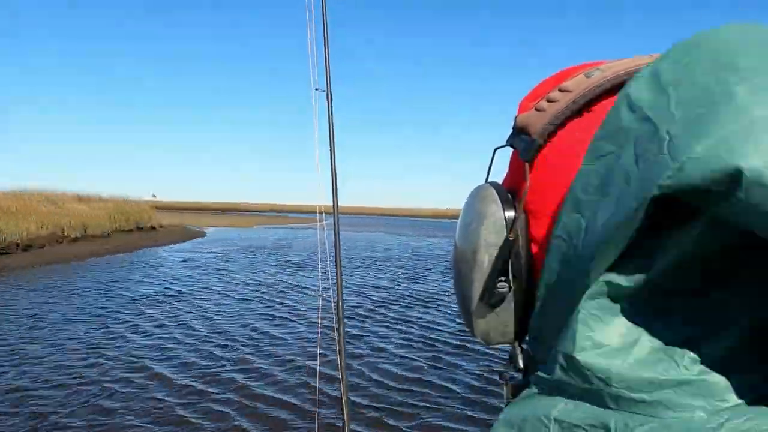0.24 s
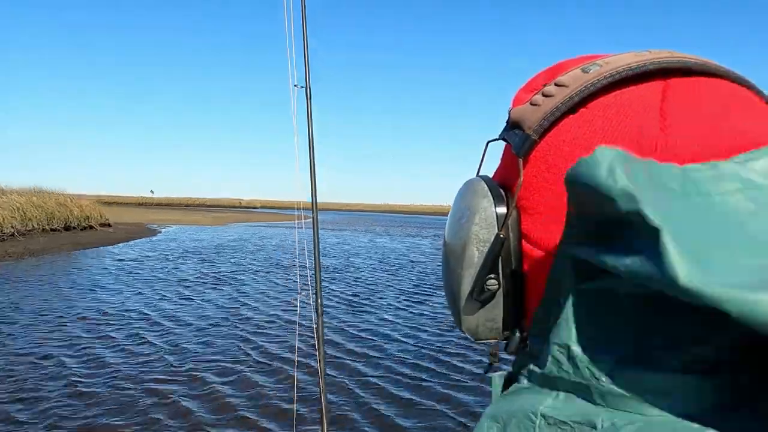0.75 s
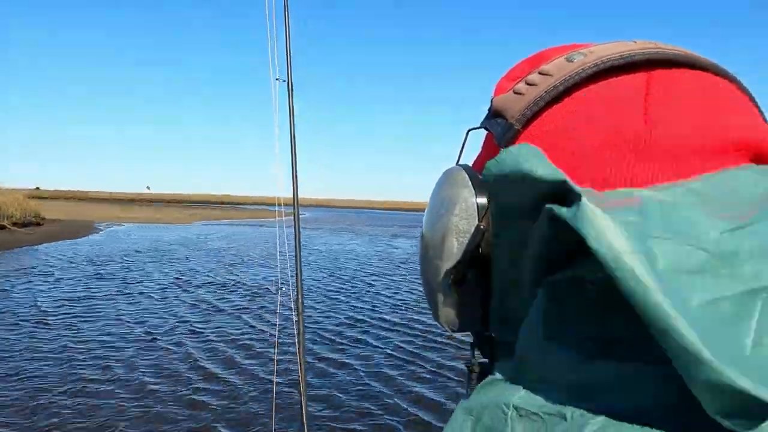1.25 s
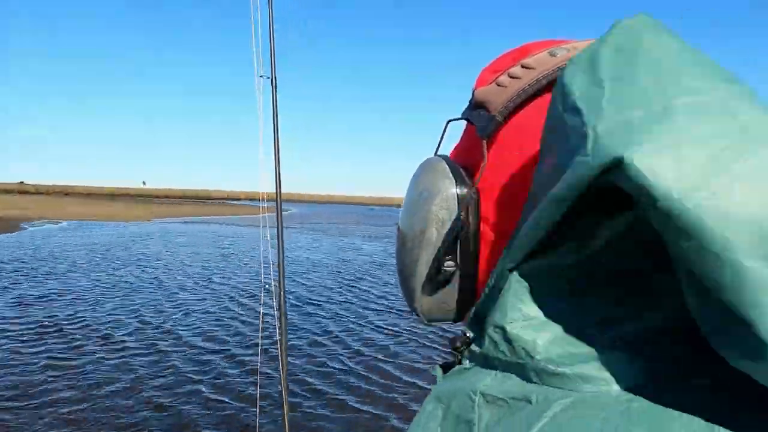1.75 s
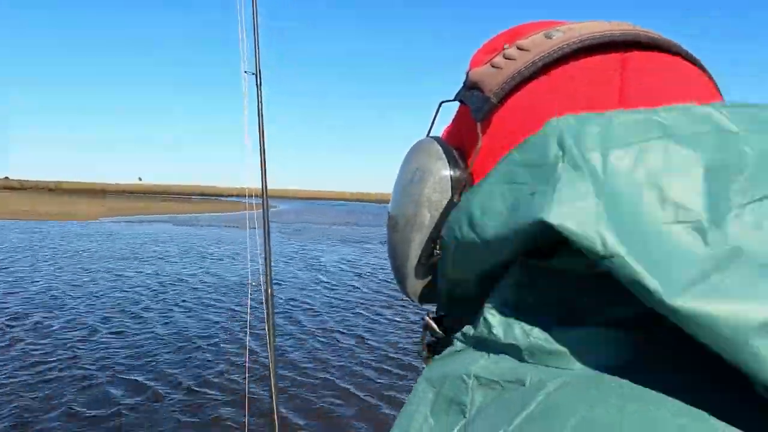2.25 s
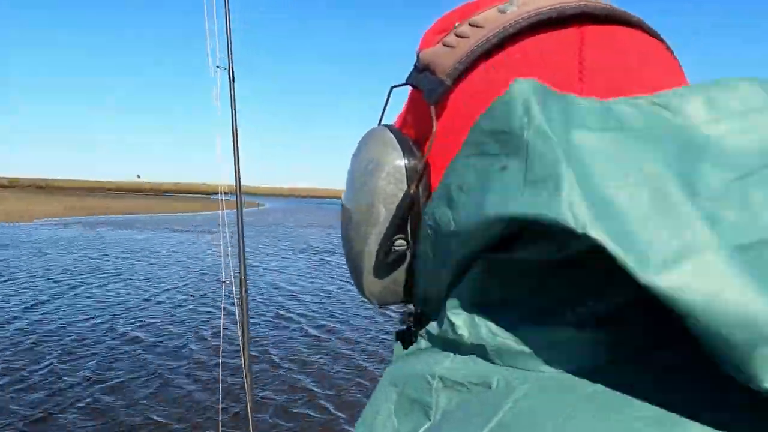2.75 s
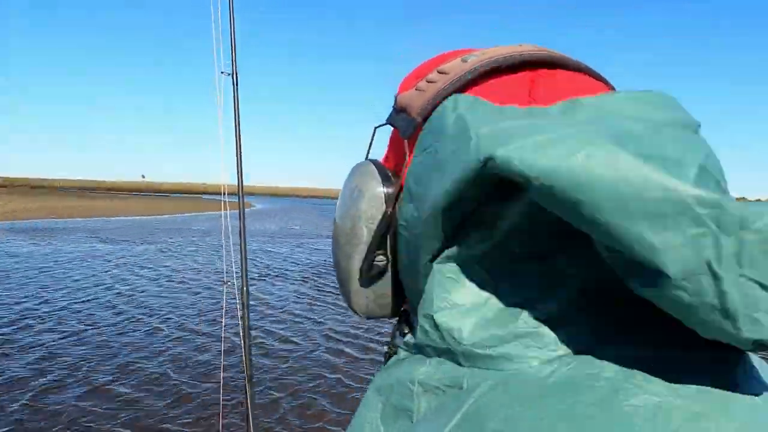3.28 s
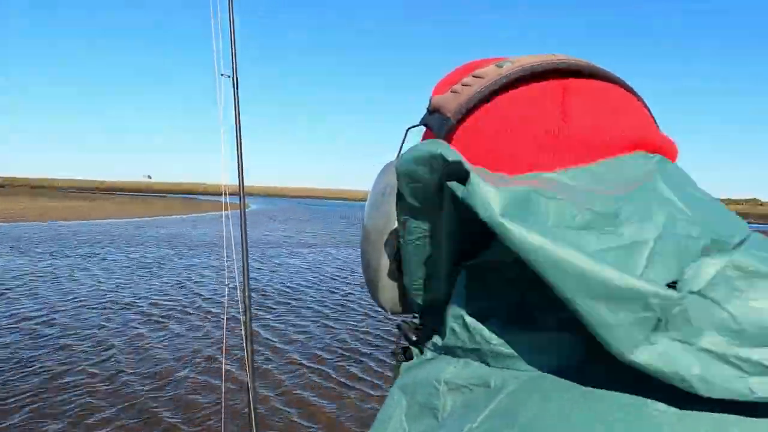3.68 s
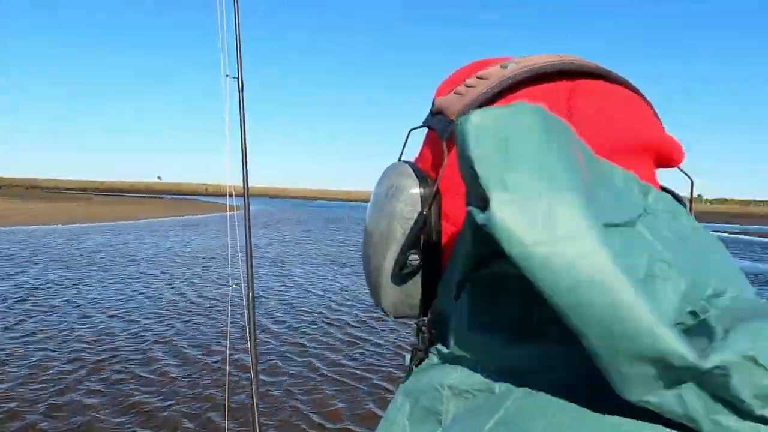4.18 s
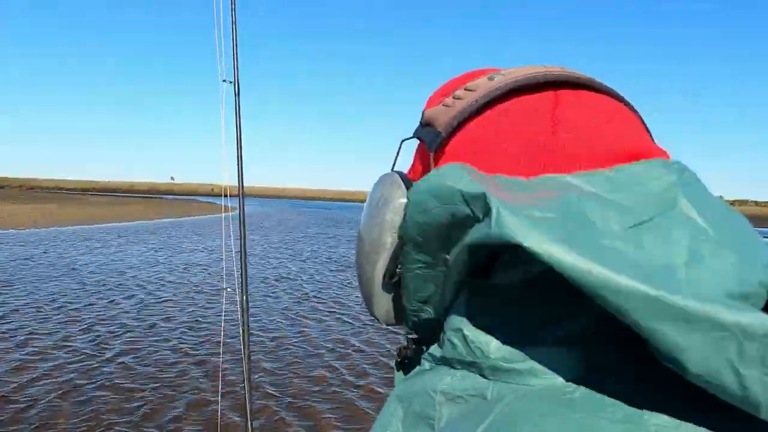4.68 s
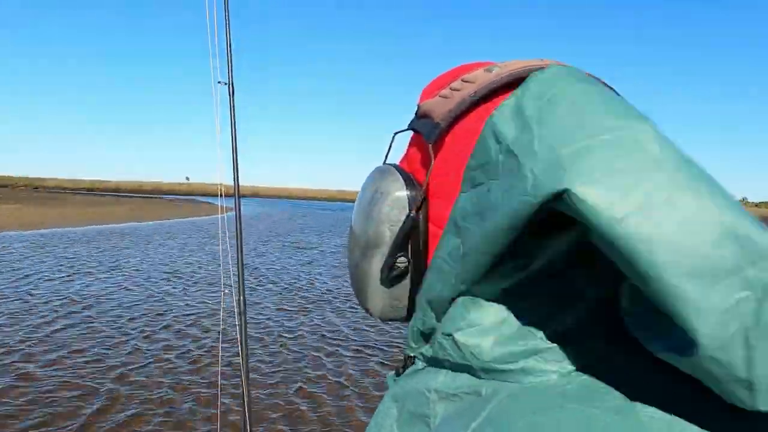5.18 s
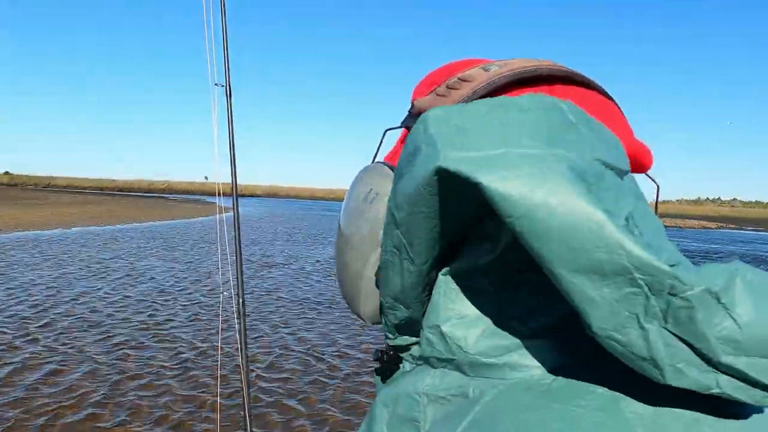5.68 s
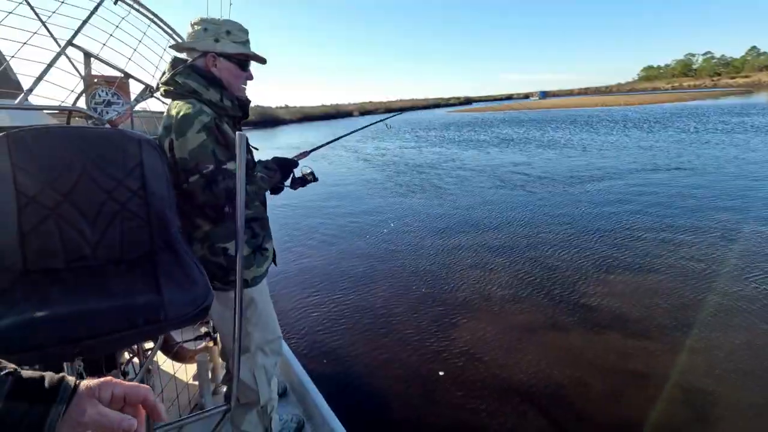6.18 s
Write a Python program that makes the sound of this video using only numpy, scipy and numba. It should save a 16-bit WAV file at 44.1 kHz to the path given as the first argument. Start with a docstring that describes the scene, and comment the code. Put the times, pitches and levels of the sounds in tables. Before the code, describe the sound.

From the start, an airboat's engine and propeller make a loud, buzzing drone, heard from on board. The pitch sinks slightly over the first two seconds, then holds steady. Churned air roars beneath it, with a lighter hiss of spray. Wind rumbles on the microphone throughout, with harder thumps around 1, 2.2 and 4.2 seconds and a swell near 2.5 seconds. A nylon hood flaps close by in short, soft, irregular bursts, clustered around 0.5 to 1.2 and 2 to 3 seconds, then sparser from 4.2 to 5.5. At about 5.9 seconds the drone cuts off with a click, and it is suddenly much quieter. Low puffs of wind bump the microphone over faint cloth rustle and a thin, quickly fading whine. Three tiny ticks come near 6.2 seconds, and the wind eases before the sound ends at about 6.4 seconds.

```python
"""An airboat's V8 engine and three-blade propeller drone at speed.
The propeller turns at half the engine's speed, so blade and exhaust tones blend into one buzz.
Air roars behind the blades, spray hisses, a nylon hood flaps and wind buffets the microphone.
Then the scene jumps to the boat at rest: gusts thump the microphone over a faint rustle,
a thin whine and a few ticks."""
import sys
import numpy as np
from scipy import signal
from scipy.fft import rfft, irfft, next_fast_len
from scipy.io import wavfile
from scipy.ndimage import uniform_filter1d
from numba import njit

SR = 44100
rng = np.random.default_rng(int(sys.argv[2]) if len(sys.argv) > 2 else 0)


def int16_out(signal):
    """Quantize to a 16-bit WAV file."""
    q = np.round(np.clip(np.atleast_2d(signal).T, -1, 1) * 32767)
    wavfile.write(sys.argv[1], SR, q.astype(np.int16))


N = 283563
T = np.arange(N) / SR

# How often the cylinders fire: time_s, firing_hz
ENGINE_SPEED = [(0, 232), (.13, 230.8), (.56, 229.3), (.75, 227.8), (1.44, 225.8), (1.9, 225), (2.2, 223.1),
                (5.89, 222.8)]
# Tones of the uneven cylinder banks: multiple_of_cycle_rate, level_db
EXHAUST_TONES = [(2, -6), (5, -8), (7, -5.5), (8, 5.5), (10, -9.5), (11, -16), (14, -35), (16, -21),
                 (17, -18.5), (19, -24), (29, -19.5), (35, -25.5)]
# Tones of the passing blades: multiple_of_blade_rate, level_db
BLADE_TONES = [(1, -1.5), (2, -3), (3, 1.5), (4, -6.5), (5, -7.2), (6, -11.3), (7, -15.5), (8, -18.5),
               (9, -19.5), (10, -18), (11, -18.5), (12, -26), (13, -25), (14, -27), (15, -31), (16, -33)]
# Air and spray behind the propeller: time_s, roar_db, hiss_db
SLIPSTREAM_LEVELS = [(0, -23, -42), (.75, -20, -42), (1.055, -22, -43), (1.075, -22.5, -46.5),
                     (1.15, -20.5, -42.5), (1.3, -22, -43.5), (1.9, -25, -46), (2.15, -21, -43),
                     (2.8, -21.5, -46), (3.2, -22.5, -44.5), (4, -22, -44), (4.8, -20, -42.5),
                     (5.89, -19, -40)]
# Wind on the microphone at speed: time_s, level_db
WIND_LEVELS = [(0, -18.5), (.4, -24.5), (.7, -17.5), (1.1, -17), (1.4, -17.5), (1.9, -18.5), (2.15, -20.5),
               (2.5, -14), (2.85, -15), (3.2, -15.5), (3.8, -21.5), (4.1, -17.5), (4.4, -18.5), (4.85, -16),
               (5.2, -19), (5.89, -23.5)]
# Its hardest blows: middle_s, strength_db
BUFFETS = [(.97, 1), (1.064, 6), (1.18, 3), (2.15, 2.5), (4.231, 6)]
# Flaps of the hood: start_s, level_db
HOOD_FLAPS = [(.53, -42), (.715, -42), (.735, -41), (.755, -45), (.835, -42), (.95, -43), (1.0, -45),
              (1.043, -42), (1.152, -44), (2.15, -44), (2.205, -43), (2.434, -37), (2.52, -40.5),
              (2.735, -41), (2.755, -45), (2.84, -40.5), (2.86, -43), (2.95, -41.5), (3.052, -42),
              (4.219, -40), (4.329, -45), (4.451, -44), (5.079, -47), (5.458, -45)]
# Pitch range of the hood: low_hz, high_hz
HOOD_BAND = [1560, 4280]
# Puffs of wind at rest: middle_s, level_db, pitch_hz, half_length_s, noise_vs_tone_db
PUFFS = [(5.92, -23, 45, .015, -30), (5.943, -23, 60, .008, -26), (5.966, -18.5, 70, .012, -22),
         (5.992, -21, 120, .007, -14), (6.008, -19, 55, .012, -22), (6.029, -15.5, 160, .005, -17),
         (6.043, -12.5, 100, .008, -21), (6.065, -16.5, 120, .008, -19), (6.095, -23, 50, .012, -22),
         (6.12, -22.5, 200, .015, -11), (6.147, -28, 190, .01, -14), (6.19, -26, 100, .01, -19),
         (6.222, -27, 150, .012, -17), (6.28, -29, 50, .015, -24)]
# Rustling cloth at rest: time_s, level_db
RUSTLE_LEVELS = [(5.9, -56.5), (6.14, -55.5), (6.16, -58), (6.185, -51), (6.21, -57.5), (6.245, -61.5),
                 (6.3, -60.5), (6.35, -57.5), (6.43, -50)]
# Small ticks at rest: start_s, level_db, pitch_hz, crack_vs_ring_db
TICKS = [(6.162, -46, 1560, -14), (6.181, -46, 1600, 8), (6.1903, -50, 1700, 7)]
# The colour of each noise, from low to high: pitch_hz, relative_level_db
ROAR_COLOUR = [(150, -5.5), (300, -2), (500, -5), (900, -10.5), (1300, -15.5), (1800, -26), (2600, -40)]
SPRAY_COLOUR = [(1060, -11), (1800, -6.5), (2720, -7.5), (3180, -7), (6130, -18), (8250, -19), (11300, -32),
                (13500, -43.5), (15500, -55)]
WIND_COLOUR = [(8, -17.5), (15, -5.5), (30, -4), (60, -1.5), (90, -3), (130, -1.5), (200, -4), (300, -9.5),
               (450, -19.5), (800, -40)]
THUMP_COLOUR = [(12, -20), (22, -4), (45, 1), (100, -9), (160, -7.5), (250, -21)]
FLUTTER_COLOUR = [(100, -35), (180, -2), (300, -7), (600, -22), (1000, -51)]
RUSTLE_COLOUR = [(410, -12), (700, -5), (1000, -10.5), (1550, -10), (2200, -12.5), (2950, -13),
                 (4100, -20.5), (4600, -20), (5300, -26), (5900, -23), (6600, -27), (8200, -33),
                 (9000, -35), (14000, -48)]

REST_START_S = 5.8973
REST_TIME_S = np.maximum(T - REST_START_S, 0)


def exhaust(cycle_angle):
    """Eight cylinders fire in each engine cycle; their uneven pulses make a stack of tones."""
    return tone_stack(cycle_angle, EXHAUST_TONES, waver_db=1.2, waver_rad=.2, rate_hz=36, sway_db=.7)


def propeller(blade_angle, firing_hz):
    """Each passing blade pushes out a pulse; faster tips crack harder and sound brighter."""
    above_cruise_hz = firing_hz - 223
    tones = [(k, db + .09 * (min(k, 9) - 4) * above_cruise_hz) for k, db in BLADE_TONES]
    return tone_stack(blade_angle, tones, waver_db=2.1, waver_rad=.38, rate_hz=28, sway_db=.6)


def wind(level_db, gust):
    """Wind rumbles on the microphone; each hard blow also swings its membrane once."""
    rumble = undb(level_db + 1.64 * gust) * noise(WIND_COLOUR, flicker_db=1.5, rate_hz=17)
    swings, swing_hz = 0, 45
    for middle_s, strength_db in BUFFETS:
        turns = (T - middle_s) * swing_hz
        swings += undb(strength_db - 13) * np.sin(2 * np.pi * turns) * np.exp(-(2 * turns) ** 2)
    return rumble + swings


def slipstream(cycle_angle, blade_angle, gust):
    """Churned air roars and spray hisses, both pulsing with the blades and the engine."""
    roar_db, hiss_db = curves(SLIPSTREAM_LEVELS)
    pulse = 1 + .086 * np.cos(blade_angle) + .12 * np.cos(2 * blade_angle) + .027 * np.cos(cycle_angle)
    roar = undb(roar_db + .69 * gust) * noise(ROAR_COLOUR, flicker_db=.4, rate_hz=40)
    spray = undb(hiss_db + .26 * wander(30)) * noise(SPRAY_COLOUR, flicker_db=.2, rate_hz=24)
    return pulse * roar + pulse ** .42 * spray


def hood():
    """A nylon hood flaps in the wind, making short, soft bursts of noise."""
    out, t = np.zeros(N), np.arange(2600) / SR
    band = signal.butter(3, HOOD_BAND, "bandpass", fs=SR, output="sos")
    rise_s = .008
    shape = t / rise_s * np.exp(1 - t / rise_s)
    for start_s, level_db in HOOD_FLAPS:
        cloth = unit(signal.sosfilt(band, rng.standard_normal(len(t))))
        add(out, start_s, undb(level_db) * cloth * shape)
    return out


def puffs():
    """Each puff of wind rocks the microphone's membrane, with some noise from swirling air."""
    out, t = np.zeros(N), np.arange(-2000, 2000) / SR
    band = signal.butter(4, [180, 480], "bandpass", fs=SR, output="sos")
    for middle_s, level_db, pitch_hz, half_length_s, noise_db in PUFFS:
        swing = np.sin(2 * np.pi * (pitch_hz * t + rng.random()))
        swirl = undb(noise_db) * unit(signal.sosfilt(band, rng.standard_normal(len(t))))
        shape = np.exp(-(t / half_length_s) ** 2)
        add(out, middle_s + t[0], undb(level_db) * (swing + swirl) * shape)
    return out


def gusts():
    """At rest, wind thumps and flutters on the microphone, then drops to a lower level."""
    drop_start_s, drop_db_per_s = 6.24, 150
    level_db = np.maximum(-31.5 - drop_db_per_s * np.maximum(T - drop_start_s, 0), -38.5)
    thump = noise(THUMP_COLOUR, flicker_db=3, rate_hz=35)
    flutter = undb(-14.5) * noise(FLUTTER_COLOUR, flicker_db=1.5, rate_hz=44)
    return undb(level_db) * (thump + flutter)


def rustle():
    """Cloth rustles faintly."""
    return undb(curves(RUSTLE_LEVELS)[0]) * noise(RUSTLE_COLOUR, flicker_db=1.3, rate_hz=53)


def whine():
    """A thin tone and its octave rise a little and quickly fade."""
    pitch_hz = np.minimum(735 + 480 * REST_TIME_S, 790)
    angle = 2 * np.pi * np.cumsum(pitch_hz) / SR
    tone = np.sin(angle) + undb(-5) * np.sin(2 * angle)
    fade = np.exp(-(REST_TIME_S / .1) ** 2)
    return undb(-57 + 2.2 * wander(60)) * fade * tone


def ticks():
    """Each tick is a tiny crack with a short ring."""
    out, t = np.zeros(N), np.arange(600) / SR
    dull = signal.butter(4, 5500, fs=SR, output="sos")
    for start_s, level_db, pitch_hz, crack_db in TICKS:
        crack = signal.sosfilt(dull, rng.standard_normal(len(t))) * np.exp(-t / .0013)
        ring = np.sin(2 * np.pi * pitch_hz * t) * np.exp(-t / .0036)
        add(out, start_s, undb(level_db) * (undb(crack_db) * crack + ring))
    return out


def tone_stack(angle, tones, waver_db, waver_rad, rate_hz, sway_db):
    """Tones at multiples of one rate; rough air sways them together and makes each one waver."""
    out = 0
    for k, db in tones:
        reach = min(k / 3, 1)  # low tones waver least
        level = undb(db + reach * waver_db * wander(rate_hz))
        lag = .3 * k * k  # echoes off hull and cage smear the pulse
        out += level * np.cos(k * angle - lag + reach * waver_rad * wander(rate_hz))
    return unit(undb(sway_db * wander(rate_hz / 2)) * out)


def noise(colour, flicker_db, rate_hz):
    """Noise of a given colour; each octave flickers in level on its own."""
    size = next_fast_len(N, real=True)
    hz = np.maximum(np.fft.rfftfreq(size, 1 / SR), 1)
    pitch_hz, level_db = np.transpose(colour)
    shape = undb(np.interp(np.log(hz), np.log(pitch_hz), level_db, -120, -120))
    spectrum = rfft(rng.standard_normal(size)) * shape
    out = 0
    for octave in np.arange(round(np.log2(pitch_hz[0])), round(np.log2(pitch_hz[-1])) + 1):
        share = np.cos(np.pi / 2 * np.clip(np.log2(hz) - octave, -1, 1)) ** 2
        out += undb(flicker_db * wander(rate_hz)) * irfft(spectrum * share, size)[:N]
    return unit(out)


def wander(rate_hz):
    """A smooth random drift, about 1 in size."""
    hold = int(SR / rate_hz)
    steps = np.repeat(rng.standard_normal(N // hold + 1), hold)
    return unit(uniform_filter1d(uniform_filter1d(steps, hold), hold)[:N])


def curves(table):
    """Join a table's points with straight lines in time."""
    time_s, *columns = np.transpose(table)
    return [np.interp(T, time_s, column) for column in columns]


def undb(db):
    """Turn decibels into a gain."""
    return 10 ** (np.asarray(db) / 20)


def unit(x):
    """Scale a sound to an average (RMS) level of 1."""
    return x / np.sqrt(np.mean(x ** 2))


def add(out, start_s, sound):
    """Mix in a short sound."""
    out[int(start_s * SR):int(start_s * SR) + len(sound)] += sound


@njit
def limit(x, top, attack_s, release_s):
    """Turn the sound down while its level is above the top."""
    out, level = np.empty(len(x)), top
    for i in range(len(x)):
        follow_s = attack_s if abs(x[i]) > level else release_s
        level += (abs(x[i]) - level) / (follow_s * SR)
        out[i] = x[i] * min(1., top / level)
    return out


def ride():
    """The boat at speed: stronger wind scatters the exhaust and blade tones, so they dip."""
    firing_hz = curves(ENGINE_SPEED)[0]
    cycle_angle = 2 * np.pi * np.cumsum(firing_hz) / SR / 8  # eight firings, one propeller turn
    blade_angle = 3 * cycle_angle
    buffet_db = sum(db / 2 * np.exp(-((T - middle_s) / .015) ** 2) for middle_s, db in BUFFETS)
    wind_db = curves(WIND_LEVELS)[0] + buffet_db
    above_calm_db = wind_db + 21
    drone = undb(-16 - .24 * above_calm_db) * exhaust(cycle_angle)
    drone += undb(-15 - .39 * above_calm_db) * propeller(blade_angle, firing_hz)
    gust = wander(14)
    return drone + wind(wind_db, gust) + slipstream(cycle_angle, blade_angle, gust) + hood()


def scene():
    """The ride breaks off with a click, and the scene changes to the boat at rest."""
    moving = limit(ride(), top=.38, attack_s=.0017, release_s=.042)
    click = np.exp(np.minimum(T - REST_START_S, 0) / .0018)
    moving = (1 - click) * moving - .37 * click  # the wave dips, then snaps back
    resting = gusts() + rustle() + whine() + ticks() + puffs()
    return np.where(T < REST_START_S, moving, resting)[None]


def record(dry):
    """The sound fades in over a millisecond and loses its highest treble."""
    treble_cut = signal.ellip(10, .2, 80, 15700, fs=SR, output="sos")
    return signal.sosfilt(treble_cut, dry * np.minimum(T / .001, 1))


dry = scene()
out = record(dry)
int16_out(out)
```